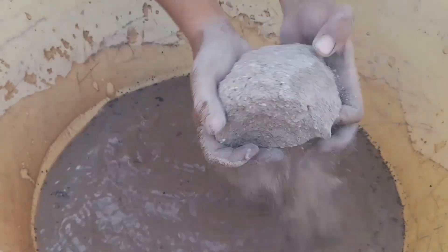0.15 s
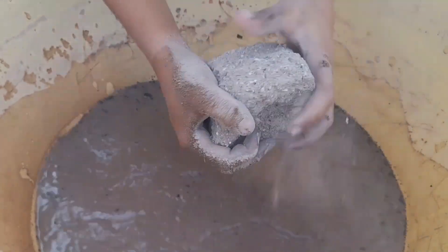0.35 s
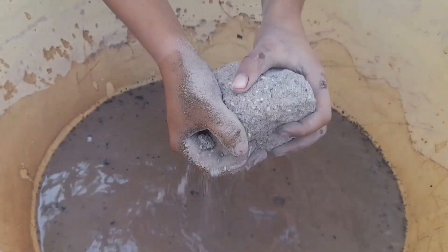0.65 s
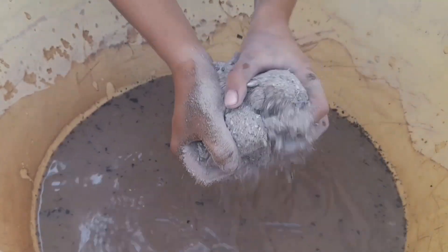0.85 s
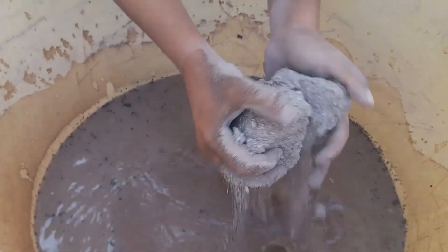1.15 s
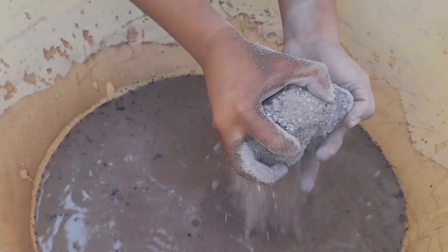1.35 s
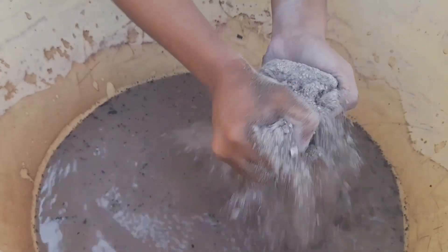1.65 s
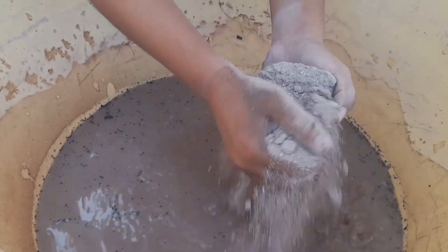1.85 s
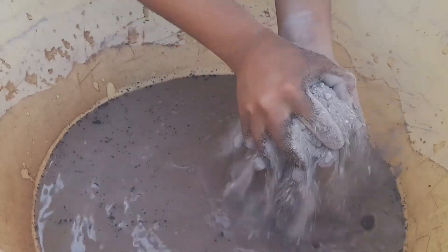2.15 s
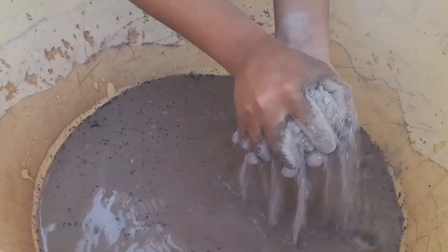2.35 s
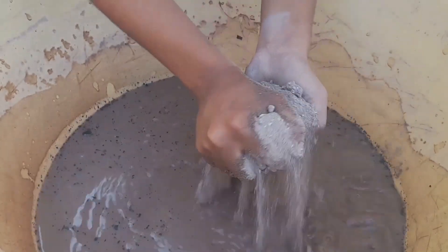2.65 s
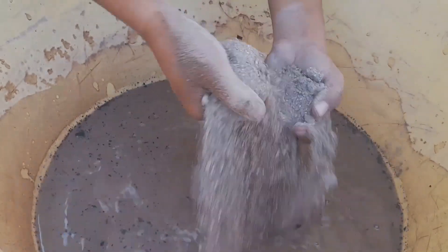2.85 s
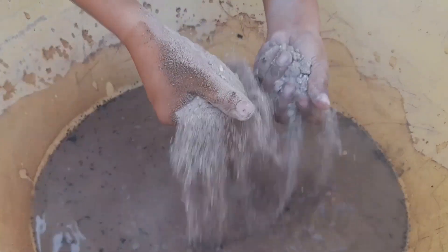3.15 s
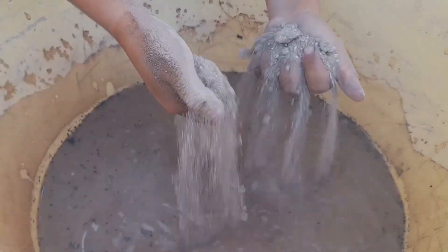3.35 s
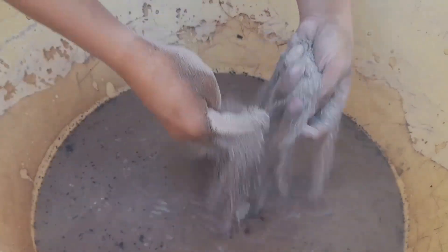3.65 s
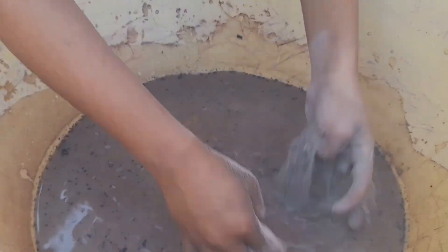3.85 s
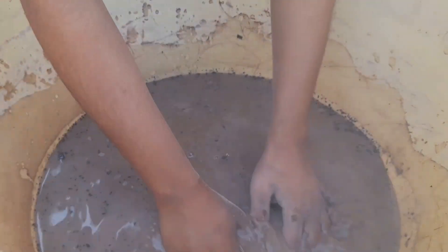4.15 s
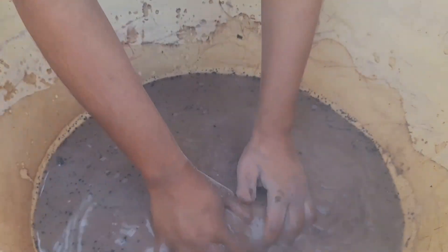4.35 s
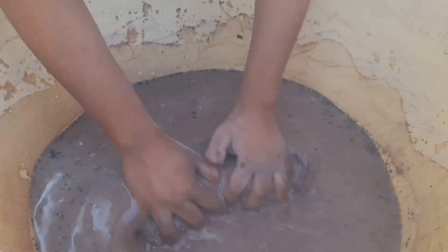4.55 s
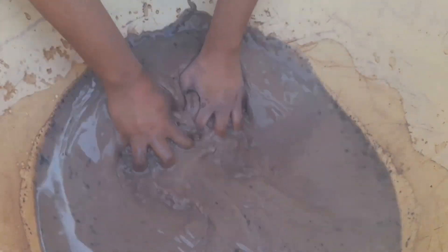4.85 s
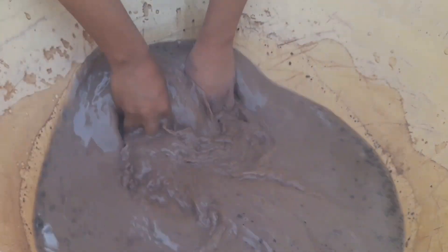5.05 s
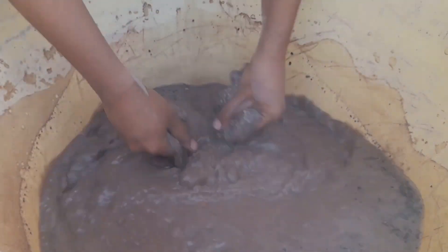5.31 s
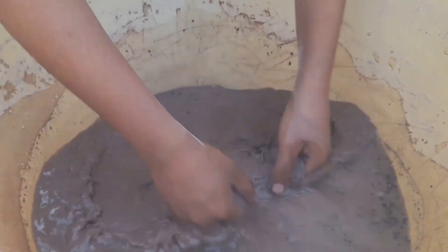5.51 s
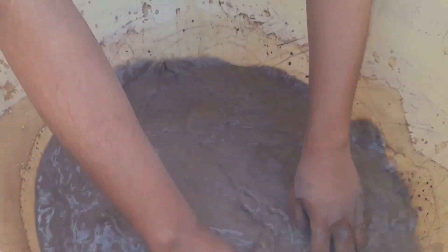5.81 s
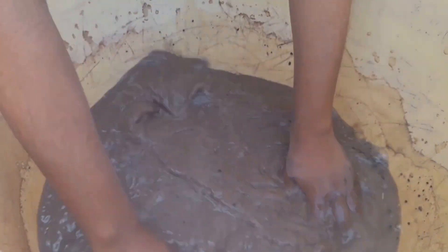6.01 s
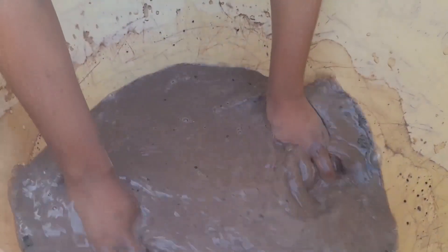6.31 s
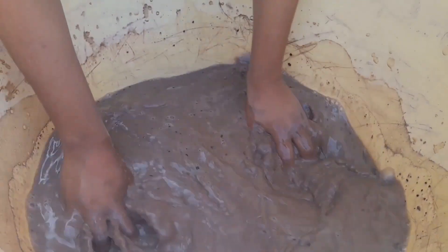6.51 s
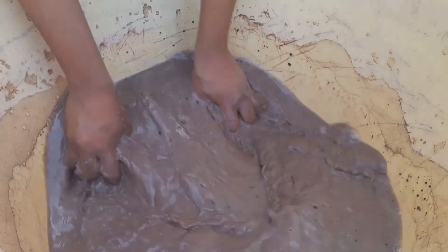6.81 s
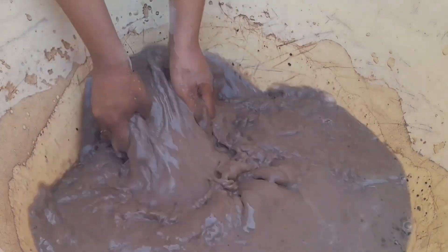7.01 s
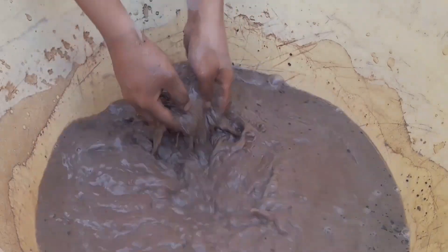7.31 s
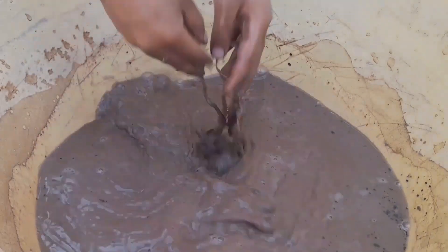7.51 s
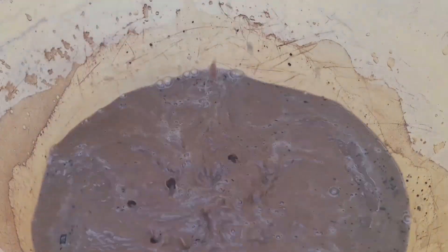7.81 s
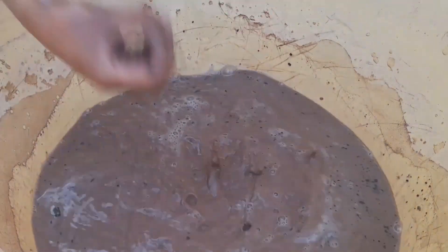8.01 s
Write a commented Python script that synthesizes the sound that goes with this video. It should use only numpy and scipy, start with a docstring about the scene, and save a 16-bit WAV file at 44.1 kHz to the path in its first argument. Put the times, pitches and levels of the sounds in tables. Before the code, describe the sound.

Hands crumble a wet block into water with close plops and splashes, followed by gurgling, sloshing mud.

```python
"""Hands crumble a wet, gritty block over a basin of muddy water, then stir and scoop the mud.
Lumps plop in and trap ringing bubbles, grit patters and ticks on the surface, and the water
sloshes against the basin wall. Out in the yard a machine hums nearby and a far bird rasps.
The microphone is close to the basin and almost mono."""
import sys
import numpy as np
from scipy import signal
from scipy.fft import rfft, irfft, next_fast_len
from scipy.io import wavfile
from scipy.ndimage import uniform_filter1d, map_coordinates

SR = 44100
rng = np.random.default_rng(int(sys.argv[2]) if len(sys.argv) > 2 else 0)


def master(y):
    """Save y as 16-bit WAV."""
    cut = np.clip(np.atleast_2d(y).T, -1, 1)
    pcm = np.round(cut * 32767)  # scale
    wavfile.write(sys.argv[1], SR, pcm.astype(np.int16))


N = 360297

# Lumps and drops landing: t/s, relative level/dB, cavity f/Hz, spray offset/dB
LUMPS = [(0.148, -21.5, 1280, -13), (0.397, -26.5, 1310, 0), (0.764, -27, 2370, -3),
         (0.783, -25.5, 2600, 1), (0.979, -19, 1500, -6), (1.052, -10, 2140, -18), (1.226, -26, 3040, -15),
         (1.276, -16, 1150, -2.5), (1.67, -16, 610, 2.5), (1.727, -11, 622, -19), (1.769, -8.5, 732, -28),
         (1.813, -23, 1630, -19), (1.83, -9, 2160, -25.5), (1.905, -11, 1220, -34), (2.01, -9.5, 1164, -17),
         (2.155, -4.5, 783, -21), (2.185, -17, 891, -11), (2.242, -21, 3170, -22),
         (2.399, -14.5, 1050, -12), (2.419, -7.5, 1520, -26), (2.447, -7.5, 460, -34),
         (2.663, -14.5, 1080, -6), (2.701, -14.5, 515, -23), (2.912, -17, 2160, -21),
         (2.94, -16.5, 1620, -23), (3.006, -17, 1870, -14), (3.019, -13.5, 790, -23),
         (3.271, -16, 1100, -19), (3.315, -20.5, 960, -15), (3.408, -14.5, 2620, -26),
         (3.584, -18.5, 2730, -15), (3.634, -16, 2930, 0.5), (3.759, -17, 1140, -31),
         (3.824, -14, 1420, -23), (3.921, -15.5, 1550, -26.5), (3.973, -16.5, 1180, -11),
         (4.109, -18, 2840, -33), (4.538, -21.5, 950, -32), (5.018, -13, 1160, -20), (5.036, -33, 634, -33),
         (5.095, -10, 590, -29), (5.16, -24, 1260, -14), (5.185, -6, 557, -28), (5.276, -10, 3760, -30),
         (5.296, -11.5, 1540, -31), (5.336, -13, 2580, -30), (5.417, -12.5, 2750, -23),
         (5.452, -15.5, 3670, -18), (5.486, -18.5, 4220, 0), (5.611, -9.5, 3920, -31),
         (5.692, -11, 1440, -20), (5.791, -14, 1020, -27), (5.807, -12.5, 856, -8), (5.846, -10, 1580, -5),
         (5.883, -12.5, 1304, -25), (6.126, -15.5, 821, -17), (6.421, -16, 1840, -14),
         (6.461, -27, 573, -18), (6.721, -20.5, 600, -18), (6.976, -20, 1080, -10), (7.016, -14, 1560, -27),
         (7.096, -18.5, 990, -10), (7.117, -14.5, 1190, -14), (7.26, -16.5, 1720, -13),
         (7.368, -11.5, 1590, -25.5), (7.391, -7.5, 2440, -31), (7.427, -25, 2160, -22),
         (7.441, -9.5, 1580, -11), (7.505, -17, 1740, -26), (7.563, -12, 1920, -14), (7.613, -16, 1180, -6),
         (7.633, -10, 2030, -20), (7.654, -7.5, 2180, -9.5), (7.666, -17, 880, -6), (7.687, -19, 650, -15),
         (7.885, -20, 940, -17), (8.097, -13.5, 840, -16), (8.116, -16, 844, 0)]


def plops():
    """A lump throws a broad splat, opens a cavity that rings briefly and slings fine spray."""
    s, db, hz, spray_db = np.transpose(LUMPS)
    cavity = bubbles(s, amp(db - 8), hz, cycles=14, rise=0.017, onset_cycles=1.0, size=1500)
    splat = slaps(s, db - 8, ms=5.4, low_hz=0.77 * hz, high_hz=2.1 * hz, rise_ms=0.094)
    spray = slaps(s, db + spray_db - 3.5, ms=15, low_hz=3600, high_hz=10900, rise_ms=0.65)
    return cavity + splat + spray


def glugs():
    """Trapped air sings: it swells, climbs ever faster in pitch and fades."""
    # Clear bubbles: t/s, level/dB, starting f/Hz, time to fade 9 dB/ms
    pockets = [(.005, -23, 1800, 3.5), (.019, -23.5, 755, 12.5), (.096, -33.5, 1480, 8),
               (.309, -35, 2670, 3.5), (.316, -39, 2110, 9), (.637, -31, 3450, 2.5), (1.024, -26, 1000, 4),
               (1.052, -14.5, 2030, 2), (1.052, -21.5, 853, 6.5), (1.053, -26, 476, 5),
               (1.115, -25, 1250, 8), (1.278, -25, 1120, 0.5), (1.428, -28, 2560, 4),
               (1.671, -20.5, 1440, 2.5), (1.675, -32.5, 704, 29), (1.692, -22, 1960, 4),
               (1.732, -14, 1540, 1.5), (1.771, -20, 756, 2), (1.833, -26, 2110, 5), (2.012, -12, 2760, -1),
               (2.016, -18.5, 560, 3), (2.157, -18, 1500, 2.5), (2.158, -15.5, 790, 4),
               (2.185, -16.5, 1340, 2), (2.203, -17, 1070, 4), (2.403, -30, 1030, 4),
               (2.422, -31, 1530, -1), (2.448, -21.5, 1920, 6), (2.45, -20, 388, 4), (2.666, -22, 1150, 4),
               (2.702, -24, 460, 2.5), (3.022, -21, 845, 0.5), (3.114, -22.5, 1550, 1.5),
               (3.135, -26.5, 2350, 8.5), (3.273, -29, 1100, 10), (3.317, -21, 1650, 1.5),
               (3.636, -26, 2740, 9), (3.657, -23, 1640, 6), (3.76, -25.5, 1010, 4), (3.826, -25, 1380, 5),
               (4.112, -19, 3050, 1.5), (4.196, -32.5, 890, 10), (4.765, -31.5, 810, 9),
               (4.963, -31, 1620, 10), (5.036, -10.5, 1940, 2), (5.042, -16, 3140, 3),
               (5.047, -12.5, 569, 14), (5.051, -15.5, 1830, 2), (5.074, -31, 756, 15),
               (5.082, -20.5, 2320, 4.5), (5.111, -17, 580, 14.5), (5.126, -27, 3440, 4.5),
               (5.189, -17.5, 640, 7), (5.295, -24, 1426, 6), (5.366, -30, 1670, 8),
               (5.453, -18.5, 3750, 2.5), (5.487, -19, 2260, 4), (5.489, -22, 4300, 5),
               (5.613, -19, 3880, 3), (5.655, -28, 1460, 15), (5.696, -17, 1960, 1.5),
               (5.701, -28, 818, 19), (5.718, -24, 890, 4), (5.764, -22, 754, 5.5), (5.792, -34, 920, 9),
               (5.811, -20.5, 895, 6), (5.816, -16.5, 1190, 5), (6.472, -26, 583, 8),
               (6.559, -23, 1920, 6.5), (6.682, -24, 695, 14), (6.722, -22.5, 1710, 2),
               (6.725, -27, 604, 12), (6.752, -31, 720, 12), (6.801, -27, 863, 14),
               (6.98, -25.5, 1110, 5.5), (7.097, -28, 990, 7), (7.118, -21.5, 1950, 2),
               (7.176, -20, 3520, 1), (7.202, -24, 500, 14), (7.225, -29, 720, 7),
               (7.293, -23.5, 767, 11.5), (7.442, -17, 1610, 5), (7.616, -23.5, 1160, 6.5),
               (7.635, -22, 1900, 5), (7.667, -17, 863, 5), (7.691, -33, 620, 16), (7.701, -21, 1430, 1.5),
               (7.708, -22, 1810, 5), (7.728, -26, 1570, 7.5), (7.888, -25.5, 1420, 2),
               (8.098, -23, 1960, 3.5), (8.118, -29.5, 1013, 13)]
    s, db, start_hz, fade_ms = np.vstack([pockets, dragged_bubbles(per_lump=2)]).T[..., None]
    fade_ms = np.maximum(fade_ms, 1)
    swell_ms = 0.55 + 0.071 * fade_ms  # larger pockets swell longer
    ms = 1000 * np.arange(SR // 9) / SR
    climb_ms = np.where(s > 5.2, 36, 78)  # from 5.2 s the stirring hands squeeze them: a faster climb
    hz = start_hz + 790 * (np.minimum(ms, 1.5 * (swell_ms + fade_ms)) / climb_ms) ** 2
    shape = np.minimum(ms / swell_ms, 1) * amp(-9 * (np.maximum(ms - swell_ms, 0) / fade_ms) ** 1.43)
    return lay(s[:, 0], amp(db) * shape * np.sin(2 * np.pi * np.cumsum(hz, axis=1) / SR))


def dragged_bubbles(per_lump):
    """Rows for glugs(): small bubbles that each lump drags under, pitched above its cavity."""
    s, db, cavity_hz, _ = np.repeat(LUMPS, per_lump, axis=0).T
    lag, loudness, pitch, life = rng.standard_normal((len(s), 4)).T
    hz = np.minimum(cavity_hz * np.exp(0.55 * abs(pitch)), 5000)
    fade_cycles = 4.9 * np.exp(0.26 * life)
    return np.transpose([s + 0.004 * abs(lag), db - 18 + 3.3 * loudness, hz, 1000 * fade_cycles / hz])


def ticks():
    """Single stones and bursting films: a few milliseconds of noise around their ring."""
    # Small hard contacts: t/s, relative level/dB, ring f/Hz
    contacts = [(.255, -26.5, 4500), (.283, -28, 8040), (.345, -30, 5000), (0.397, -23, 3000),
                (.432, -25, 4200), (0.4884, -19.5, 4140), (.55, -30, 4500), (.72, -36, 5500),
                (.742, -31.5, 5200), (0.7652, -25, 3323), (0.7831, -37, 3380), (0.9734, -29, 3080),
                (1.053, 2, 10200), (1.106, -12.5, 7000), (1.2466, -22, 5360), (1.275, -23, 3740),
                (1.341, -24, 5100), (1.5943, -30.5, 3220), (1.6633, -4.5, 4730), (1.769, -14, 3620),
                (1.991, -14.5, 5630), (2.012, -2, 3500), (2.1355, -16, 6350), (2.155, -9, 3270),
                (2.1809, -11.5, 8250), (2.2, -7, 5160), (2.2432, -9, 3270), (2.4463, -5.5, 4640),
                (2.6162, -13, 3090), (2.6625, -13, 3420), (2.921, -12, 6900), (3.019, -8.5, 4200),
                (3.0714, -19, 3780), (3.11, -14.5, 5170), (3.5295, -12, 3650), (3.632, -17, 3220),
                (3.9213, -19, 5030), (3.949, -19, 4280), (4.8594, -25.5, 5140), (4.9447, -21.5, 3100),
                (5.08, -10, 6360), (5.11, -25, 3430), (5.1731, -25, 4420), (5.2065, -15, 4100),
                (5.4859, -2.5, 4200), (5.598, -20, 9000), (5.6104, -3, 3770), (5.73, -15, 4200),
                (5.768, -14, 3150), (5.813, -14, 3180), (5.8454, -9.5, 8060), (5.872, -8.5, 7000),
                (5.8823, 1, 3080), (5.897, -15, 7000), (5.934, -26.5, 4000), (6.4577, -15, 5600),
                (6.465, -18, 2200), (6.53, -14.5, 1800), (6.543, -13, 3290), (6.571, -15, 4380),
                (6.588, -12.5, 2000), (6.6657, -20, 3030), (6.7226, -16, 3470), (6.748, -23, 3500),
                (6.783, -15, 3680), (6.906, -21, 2800), (6.928, -24, 2500), (6.9653, -21, 3250),
                (7.044, -15, 2700), (7.162, -11.5, 3220), (7.2494, -30, 3100), (7.4405, -34, 3040),
                (7.5214, -14, 3560), (7.554, -25, 5700), (7.5857, -23, 3850), (7.6046, -13.5, 3570),
                (7.6881, -2, 3520), (7.9314, -21, 7540), (8.09, -30, 4536), (8.097, -15, 5500)]
    s, db, hz = np.transpose(contacts)
    high_hz = np.minimum(1.35 * hz, 11500)
    return slaps(s, db - 7, ms=10.8, low_hz=0.8 * hz, high_hz=high_hz, rise_ms=0.25, snap=2.4)


def thuds():
    """Shoved by a heavy clod, the mud gives way in a few slow cycles."""
    # Clods landing: t/s, relative level/dB, f/Hz
    clods = [(1.051, -38, 168), (1.663, -25, 257), (2.182, -35, 173), (2.445, -22.5, 227),
             (2.692, -36, 170), (5.047, -39, 261), (5.185, -17, 370)]
    s, db, hz = np.transpose(clods)
    return bubbles(s, amp(db + 1.5), hz, cycles=9, rise=0.044, onset_cycles=0.18, size=3000)


def water():
    """The slosh carries large gurgling bubbles, the froth small ones, the patter short grains of grit."""
    # Steady stir and pour: t/s, then relative level/dB of slosh, froth and grit
    flow = [(0, -41, -38.5, -39), (.15, -51, -49, -45), (.21, -55, -66, -50.5), (.5, -57, -68, -57),
            (.73, -55, -67, -56), (.95, -51, -55, -53.5), (1.4, -61, -56, -51), (1.75, -43, -37.5, -37),
            (2.34, -48, -49, -42.5), (2.5, -49, -51, -48), (2.85, -50.5, -48.5, -43.5),
            (3.1, -40.5, -37, -36), (3.4, -47.5, -46.5, -46.5), (3.7, -42, -35.5, -37.5),
            (3.97, -39, -52.5, -45.5), (4.04, -49.5, -61, -53), (4.3, -38.5, -47.5, -56),
            (4.95, -38.5, -45.5, -57.5), (5.07, -30.5, -42, -44), (5.45, -49, -43.5, -47),
            (5.89, -35, -35.5, -41.5), (5.95, -43.5, -48, -48), (6.15, -36.5, -53, -54.5),
            (6.6, -36.5, -39, -47.5), (7.0, -35, -43.5, -47), (7.25, -28, -35, -41.5),
            (7.42, -48, -41, -52), (7.68, -38, -43, -36.5), (7.76, -52.5, -68, -55),
            (8.07, -53, -72, -54.5), (8.17, -31.5, -63, -38)]
    # Spectra of moving water, bursting froth and falling grit: f/Hz, relative level/dB
    slosh_spectrum = [(150, -43.5), (250, -12), (506, 0), (624, -4), (830, 0.5), (1650, -6), (2480, -16),
                      (3100, -18), (6000, -36), (9000, -52), (11700, -75), (19800, -120)]
    froth_spectrum = [(900, -19), (1600, 0.5), (2500, 2.5), (4000, -8.5), (7000, -31)]
    grit_spectrum = [(880, -52), (1500, 4), (1660, -2.5), (1920, -4), (2230, 3.5), (2940, 1), (8400, -8.5),
                     (14900, -20), (16000, -24)]
    slosh_db, froth_db, grit_db = curves(flow)
    splash, pour = handfuls()
    air = aeration()
    surge = air * wobble(25)
    slosh = 0.52 * rush(slosh_spectrum, patchy_db=3) + 0.3 * air * swarm(
        900, centre_hz=905, spread=0.366, cycles=25.5, rise=0.13, onset_cycles=1.9,
        scatter_db=4, size=1500)
    froth = 0.36 * rush(froth_spectrum, patchy_db=3.5) + 0.9 * air * swarm(
        4200, centre_hz=2587, spread=0.357, cycles=17, rise=0.075, onset_cycles=1.6,
        scatter_db=4.2, size=500)
    grains = swarm(9000, centre_hz=6150, spread=0.42, cycles=7, rise=0, onset_cycles=0.78,
                   scatter_db=3.5, size=96)
    patter = 0.71 * rush(grit_spectrum, patchy_db=5) + 0.38 * air * grains
    slosh *= (amp(slosh_db) + splash) * amp(1.5 * surge)
    froth *= (amp(froth_db) + amp(-6.5) * splash) * amp(0.69 * surge + 1.85 * air * wobble(30))
    patter *= (amp(grit_db) + pour) * amp(1.5 * surge + 1.6 * air * wobble(70))  # grit pours unevenly
    return slosh + froth + patter


def handfuls():
    """Gains of slosh and of grit: each handful swells to its peak and fades a little more slowly."""
    # Falls and splashes: peak t/s, time to swell 9 dB/s (sign ignored), slosh level/dB, grit level/dB
    falls = [(.412, .012, -56, -48), (.5, 0.04, -60, -47), (.62, .012, -55, -40), (.652, .008, -58, -39.5),
             (.835, 0.005, -41, -35), (.875, 0.03, -45, -35.5), (.93, -0.01, -55, -44),
             (1.0, .025, -43, -34.5), (1.054, .03, -31, -32), (1.12, .04, -39, -42),
             (1.27, 0.1, -49.5, -45), (1.432, 0.06, -50, -41.5), (1.56, 0, -41, -37),
             (1.619, 0.0168, -37, -33), (1.68, -0.02, -33, -31.5), (1.82, 0.03, -55, -43),
             (2.02, -0.05, -48, -54), (2.19, 0.0135, -26.5, -32), (2.428, 0.0533, -39, -39.5),
             (2.56, 0.05, -44, -42), (2.65, 0.0636, -40, -36), (3.04, 0.02, -44, -42),
             (3.28, 0.11, -53, -41), (3.65, .03, -40, -41), (3.82, .04, -47, -48), (5.05, 0.01, -26.5, -48),
             (5.12, 0.07, -41, -67), (5.19, 0.03, -29, -43.5), (5.29, 0.0358, -33, -58),
             (5.37, 0.03, -45, -51), (5.495, 0.02, -36.5, -38.5), (5.55, 0.02, -48, -58),
             (5.64, 0.08, -44.5, -48.5), (5.74, 0.0073, -25.5, -34), (5.81, 0.03, -41, -54),
             (5.86, 0.01, -41, -34), (6.12, .02, -37.5, -58), (6.4, 0.26, -64, -64),
             (6.55, -0.0055, -40, -41), (6.67, -0.02, -45, -42), (6.8, -0.01, -33, -52),
             (7.17, -0.0036, -27, -33), (7.27, -0.0149, -36, -39), (7.39, -0.05, -48, -45.5),
             (7.44, 0, -47, -47), (7.62, -0.01, -40, -40), (7.708, .012, -29, -49), (7.9, 0.1, -52.5, -72),
             (8.106, -0.0263, -32, -37.5), (8.135, -0.02, -38, -43)]
    s, swell, slosh_db, grit_db = np.transpose(falls)[..., None]
    t = np.arange(0, N + 64, 64) / SR - s
    shape = amp(-9 * np.where(t < 0, t / swell, t / (1.13 * swell)) ** 2)
    return [np.repeat((amp(db) * shape).sum(0), 64)[:N] for db in (slosh_db, grit_db)]


def aeration():
    """Gain of 1 while the surface is broken, 9 dB less while the hands stay under and draw in no air."""
    # Hands submerged: from t/s, to t/s
    submerged = [(4.13, 4.93), (5.96, 6.38)]
    t = np.arange(N) / SR
    under = sum(np.clip(np.minimum(t - start, end - t) / 0.05, 0, 1) for start, end in submerged)
    return amp(-9 * under)


def basin_echo(x):
    """The basin wall returns a short scattered echo."""
    t = np.arange(SR // 8) / SR
    tail = rng.standard_normal(len(t)) * amp(-60 * t / 0.051)
    return signal.fftconvolve(np.pad(x, (60, 0)), tail / np.linalg.norm(tail))[:N]


def machine():
    """A nearby machine hums in slightly unsteady tones over the low rumble of machinery farther off."""
    # Hum tones: f/Hz, relative level/dB, pitch wander/Hz
    tones = [(75.3, -47.5, 6.07), (149.8, -39.5, 2.3), (228.5, -56.5, 3.55)]
    # Rumble spectrum: f/Hz, relative level/dB
    spectrum = [(12, -44), (20, -28), (54, -1), (107, -3), (151, -3), (195, -4), (250, -4), (351, -21),
                (450, -22), (580, -19.5), (990, -120)]
    # Slow drift of hum and rumble together: t/s, relative level/dB
    drift = [(0, -41), (1.2, -39), (2.9, -37), (4.2, -39.5), (6.6, -39), (8.17, -42)]
    t = np.arange(N) / SR
    hum = 0
    for hz, db, wander_hz in tones:
        gain = np.sqrt(2) * amp(db + 1.2 * wobble(4.7))
        turns = hz * t + np.cumsum(wander_hz * wobble(11)) / SR
        hum += gain * np.sin(2 * np.pi * turns)
    return amp(curves(drift)[0] + 36.5) * (hum + amp(-37.5) * rush(spectrum, patchy_db=1))


def bird(pitch_hz=290, attack_s=0.052, release_s=0.06):
    """Hoarse calls from far away: uneven pulses and breath noise through narrow throat resonances."""
    # Calls: t/s, length/s, level/dB
    caws = [(0.476, 0.22, -49), (1.17, 0.28, -50.5), (7.983, .18, -49.5)]
    # Throat resonances: f/Hz, width/Hz, relative level/dB
    resonances = [(1720, 260, 4.5), (2020, 200, -9), (1450, 330, -6)]
    turns = np.cumsum(pitch_hz * (1 + 0.0316 * wobble(40))) / SR
    pulses = unit(np.diff(np.floor(turns), prepend=0))
    breath = 1.3 * rng.standard_normal(N)
    voice = filtered(pulses + breath, lambda f: sum(
        amp(db) * (1j * f * width / (hz * hz - f * f + 1j * f * width)) ** 2
        for hz, width, db in resonances))
    t = np.arange(N) / SR
    calls = sum(amp(db) * np.clip(np.minimum((t - s) / attack_s, 1 + (s + length - t) / release_s), 0, 1)
                for s, length, db in caws)
    return unit(voice) * calls


def yard_hiss():
    """Faint air of the yard and the microphone's own hiss."""
    # Noise floor: f/Hz, relative level/dB
    spectrum = [(180, -6), (300, 18.5), (667, -2), (2360, -25), (2700, -9), (3760, -1), (4160, -14.5),
                (5520, -1.5), (6620, -8), (16000, -14.5)]
    return amp(-55.5) * rush(spectrum, patchy_db=2.5)


def stereo_image(mid):
    """Almost mono: the bass is centred and the treble has a slight, diffuse stereo width."""
    # Stereo width: f/Hz, side level against mid/dB
    width = [(3000, -50), (4200, -21), (6000, -10), (15000, -9)]
    hz, _, bins = signal.stft(mid, SR, nperseg=128)
    bins = bins * amp(along(width, hz))[:, None] * np.exp(2j * np.pi * rng.random(bins.shape))
    side = signal.istft(bins, SR, nperseg=128)[1][:N]
    return np.array([mid + side, mid - side])


def bubbles(s, gain, hz, cycles, rise, onset_cycles, size):
    """Damped sines, 60 dB down after `cycles`, that climb in pitch as the bubble nears the surface."""
    turns = hz[:, None] * np.arange(size) / SR
    life = turns / np.maximum(np.reshape(cycles, (-1, 1)), 1)
    shape = amp(-60 * life) * (1 - np.exp(-turns / onset_cycles))
    shape /= shape.max(1, keepdims=True)
    ring = np.sin(2 * np.pi * turns * (1 + rise * np.minimum(life, 1)))
    return lay(s, gain[:, None] * shape * ring)


def swarm(count, centre_hz, spread, cycles, rise, onset_cycles, scatter_db, size):
    """A random shower of bubbles or grains of rms 1, a few much louder than the rest."""
    when, loudness = rng.random((count, 2)).T
    pitch, life = rng.standard_normal((count, 2)).T
    hz = np.clip(centre_hz * np.exp(spread * pitch), 250, 15000)
    gain = amp(-scatter_db * np.log(1 - 0.995 * loudness))
    return unit(bubbles(when * N / SR, gain, hz, cycles * np.exp(0.4 * life), rise, onset_cycles, size))


def slaps(s, db, ms, low_hz, high_hz, rise_ms, snap=0):
    """Short bursts of noise, each in its own band, dying 60 dB in `ms`."""
    t = np.arange(SR // 40) / SR
    shape = amp(-60 * t / (ms / 1000)) * (1 - np.exp(-t / (rise_ms / 1000)))
    burst = rng.standard_normal((len(s), len(t))) * shape
    burst[:, 0] = snap  # first contact
    f = np.fft.rfftfreq(2 * len(t), 1 / SR)
    low, high = 1j * f / np.reshape(low_hz, (-1, 1)), 1j * f / np.reshape(high_hz, (-1, 1))
    band = (low / (1 + low)) ** 2 / (1 + 1.55 * high + high ** 2) ** 3
    burst = irfft(rfft(burst, 2 * len(t)) * band)[:, :len(t)]
    return lay(s, amp(db)[:, None] * burst / np.abs(burst).max(1, keepdims=True))


def rush(spectrum, patchy_db):
    """Coloured noise of rms 1 with patches of random gain in time and frequency."""
    bins = signal.stft(rng.standard_normal(N + 512), nperseg=256)[2]
    patches = uniform_filter1d(uniform_filter1d(rng.standard_normal(bins.shape), 5, 0), 5, 1)
    noise = signal.istft(bins * amp(patchy_db * unit(patches)), nperseg=256)[1][:N]
    return unit(filtered(noise, lambda hz: amp(along(spectrum, hz))))


def amp(db):
    """Decibels to gain."""
    return 10 ** (np.asarray(db) / 20)


def unit(x):
    """Scaled to rms 1."""
    return x / np.sqrt(np.mean(x ** 2) + 1e-20)


def along(points, hz):
    """Interpolates (f/Hz, value) points on a log frequency axis."""
    f, values = np.transpose(points)
    return np.interp(np.log(hz + 1), np.log(f + 1), values)


def curves(rows):
    """One value per sample for each column after the time."""
    s, *columns = np.transpose(rows)
    return [np.interp(np.arange(N) / SR, s, column) for column in columns]


def wobble(rate):
    """A smooth random curve, `rate` knots a second."""
    return map_coordinates(rng.standard_normal(int(N * rate / SR) + 4), [np.arange(N) * rate / SR])


def filtered(x, response):
    """x through a complex frequency response."""
    size = next_fast_len(N + SR // 2)
    return irfft(rfft(x, size) * response(np.fft.rfftfreq(size, 1 / SR)), size)[..., :N]


def lay(s, rows):
    """Adds each row of samples at its time in seconds."""
    at = np.round(s * SR).astype(int)[:, None] + np.arange(rows.shape[1])
    return np.bincount(at.ravel(), rows.ravel(), N + SR)[:N]


def scene():
    """The basin close to the microphone, with the machine, the bird and the yard behind it."""
    hits = plops() + glugs() + ticks() + thuds()
    return stereo_image(hits + amp(-11) * basin_echo(hits) + water() + machine() + bird() + yard_hiss())


def record(dry):
    """The microphone chain passes nothing above 15.9 kHz."""
    return filtered(dry, lambda hz: hz < 15900)


dry = scene()
out = record(dry)
master(out)
```